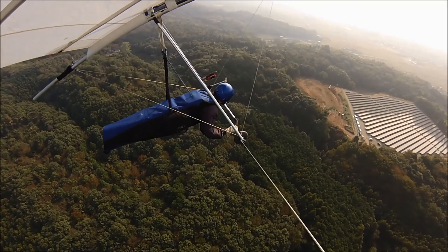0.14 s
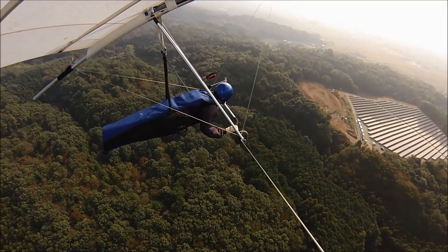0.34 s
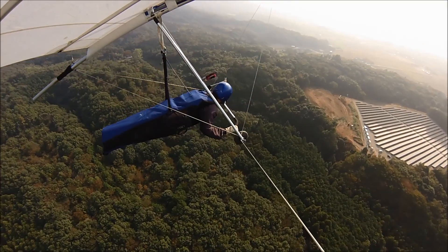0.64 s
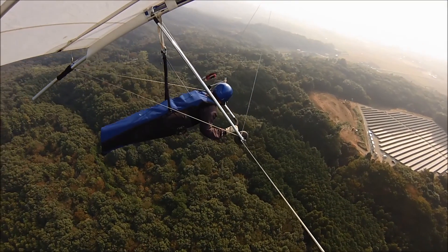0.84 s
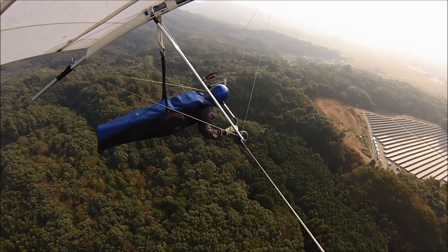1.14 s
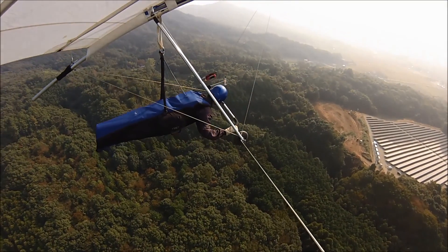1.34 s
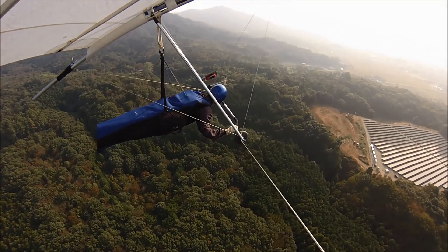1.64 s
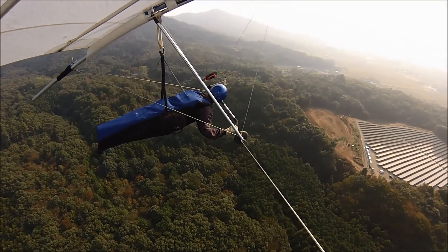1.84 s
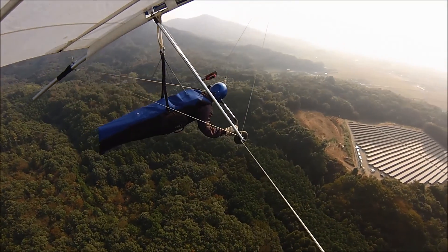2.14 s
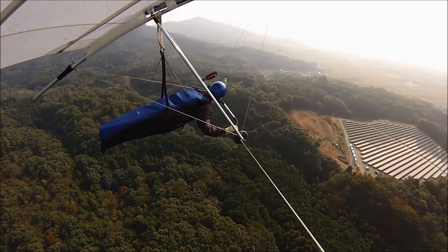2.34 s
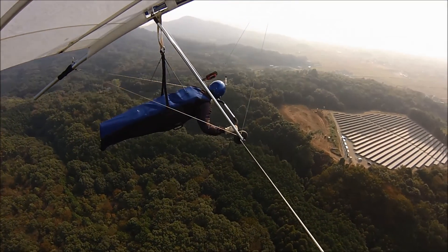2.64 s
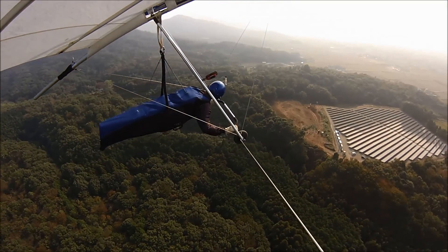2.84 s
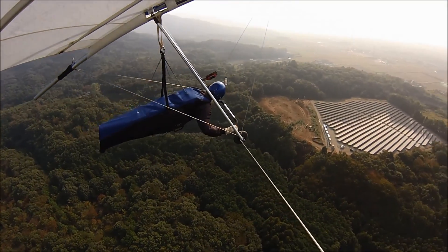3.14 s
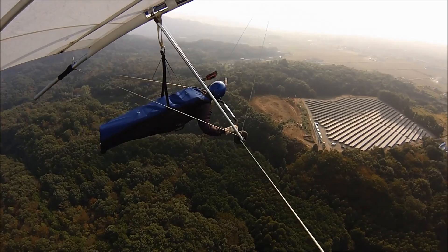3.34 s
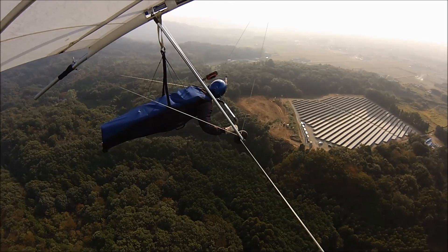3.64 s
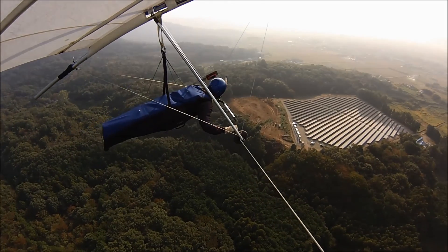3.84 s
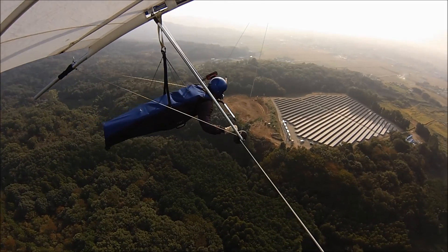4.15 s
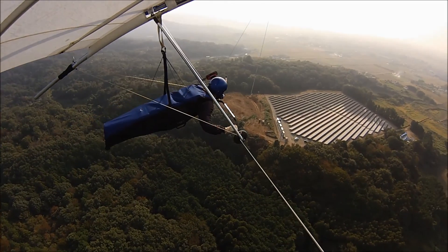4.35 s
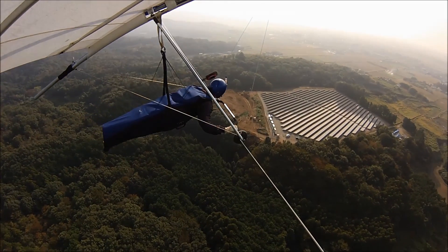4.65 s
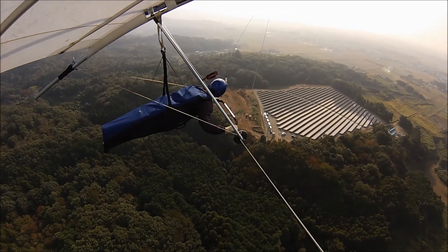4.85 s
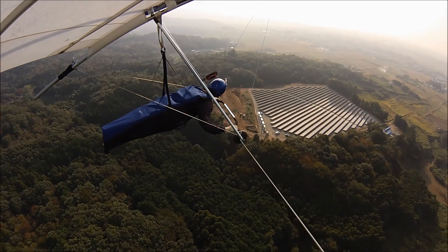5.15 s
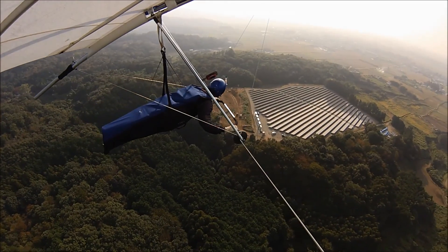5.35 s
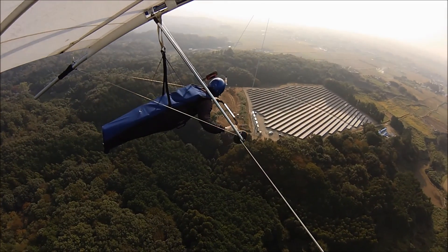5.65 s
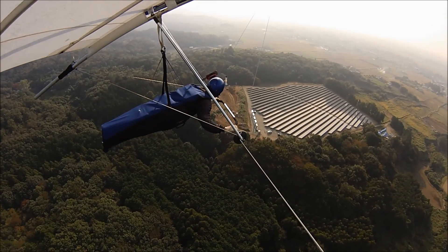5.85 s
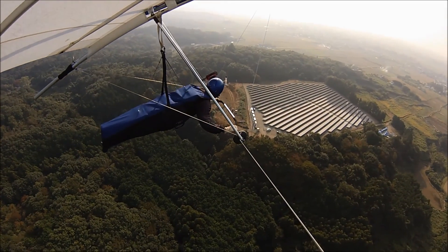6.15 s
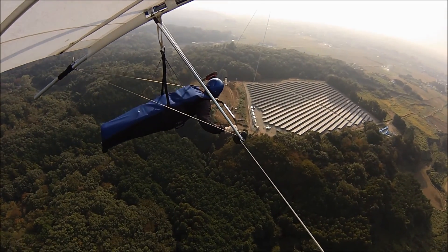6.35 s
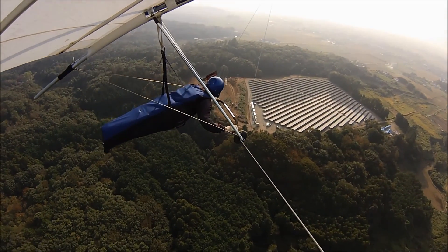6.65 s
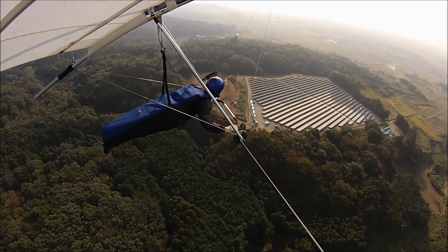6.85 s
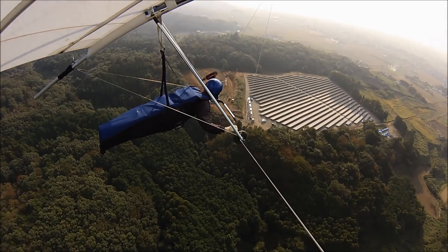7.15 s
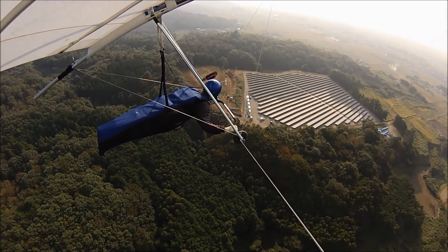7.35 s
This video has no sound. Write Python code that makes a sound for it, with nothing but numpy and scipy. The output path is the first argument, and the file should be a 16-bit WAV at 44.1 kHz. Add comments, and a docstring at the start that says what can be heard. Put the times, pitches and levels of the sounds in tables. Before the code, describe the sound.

On the wing of a hang glider in flight, low wind rumble dominates, battering a close microphone in rapid irregular thumps with small crackles and momentary lulls. A mid-range rush and thin hiss of air run throughout, with a faint breathy wire tone wavering beneath. Tiny ticks and squeaks come from the rigging, with a soft double knock around 2.4 seconds and another near 4.7.

```python
"""On the wing of a hang glider in flight, where a microphone hears turbulence, wires and rigging.
Shaped noise buffets and thumps at the microphone, which crackles at large pressure swings. Noise bands
give the rush, hiss and moan of air past sail and tubes; narrow bands that follow pitch curves are the
singing wires. Short tones and noise bursts make the ticks, squeaks, scuffs and knocks of the rigging."""
import sys
import numpy as np
from scipy import signal
from scipy.fft import rfft, irfft
from scipy.io import wavfile
from scipy.ndimage import uniform_filter1d

SR = 44100
rng = np.random.default_rng(int(sys.argv[2]) if len(sys.argv) > 2 else 0)


def transcribe(u):
    """Save the signal u as a 16-bit wav file named by the first command-line argument.

    u: samples, shape (n,) or (channels, n), limited to [-1, 1]; the rate is SR.
    q: integer samples, one column per channel.
    """
    v = np.clip(np.atleast_2d(u).T, -1, 1)
    q = np.round(v * 32767).astype(np.int16)
    wavfile.write(sys.argv[1], SR, q)


N = 330750
TIME = np.arange(N) / SR

# hardest eddies: start_s [s, centre], crackle_db [dB, relative],
# swing [share of full scale, before the lulls], half_width_s [s]
HARD_EDDIES = [(0.032, -48, 0.37, 0.0021), (.087, -51, 0.59, .002), (.181, -52, 0.36, 0.0033),
               (0.288, -45, 0.36, 0.0026), (0.376, -42, 0.47, .0028), (.453, -55, 0.37, 0.0027),
               (.5, -54, 0.38, 0.0027), (.578, -43, 0.42, 0.003), (.713, -50, 0.34, 0.0025),
               (0.731, -51, .42, .0022), (.746, -53, 0.51, 0.0023), (.846, -44, 0.43, 0.0026),
               (1.038, -40.5, 0.37, 0.0019), (1.119, -48, 0.56, 0.0026), (1.176, -63, .37, 0.002),
               (1.294, -54, 0.47, 0.0027), (1.524, -50, 0.38, 0.0027), (1.781, -50, 0.33, 0.0027),
               (1.869, -43.5, 0.41, 0.0028), (2.273, -53, 0.33, 0.0031), (3.032, -47, 0.31, 0.0063),
               (3.677, -60, .39, 0.0039), (4.343, -52, 0.32, 0.0033), (4.555, -49, 0.36, 0.0024),
               (5.1, -46, 0.33, 0.0032), (5.577, -41.5, .47, 0.0027), (5.952, -58, 0.18, 0.0017),
               (6.329, -46, 0.15, 0.0024), (6.512, -48, 0.4, 0.0029), (6.631, -50, 0.37, 0.0044),
               (7.204, -62, 0.45, 0.002), (7.355, -42, .35, .003), (7.362, -53, .42, 0.0026)]


def gain_of(db):
    """Level law: decibels to an amplitude ratio."""
    return 10 ** (np.asarray(db) / 20)


def evened(x):
    """Normalisation of mean power: scales to rms 1."""
    return x / np.sqrt(np.mean(x ** 2) + 1e-20)


def follow(rows):
    """Linear interpolation: the value columns of a curve table at every sample."""
    s, *columns = np.transpose(rows)
    return [np.interp(TIME, s, column) for column in columns]


def coloured(points):
    """Spectral shaping: white noise weighted by a spectrum of (Hz, dB per Hz), rms 1."""
    hz, db = np.transpose(points)
    freq = np.fft.rfftfreq(N, 1 / SR)
    shape_db = np.interp(np.log(freq + 1), np.log(hz), db)
    white = rng.standard_normal(N)
    return evened(irfft(rfft(white) * gain_of(shape_db), N))


def wander(rate_hz):
    """Random modulation: noise above 2 Hz that falls off smoothly past the given rate, rms 1."""
    freq = np.fft.rfftfreq(N, 1 / SR)
    weight = (freq > 2) / (1 + (freq / rate_hz) ** 2)
    return evened(irfft(rfft(rng.standard_normal(N)) * weight, N))


def steadied(x, span_s=0.068, share=0.52):
    """Partial gain levelling: divides out a share of the chance swells of a noise, rms 1."""
    power = abs(uniform_filter1d(x ** 2, int(span_s * SR))) + 1e-9
    return evened(x / power ** (share / 2))


def fuzzy(hz, width_hz, size=N):
    """Heterodyning: low-passed complex noise shifted to a pitch makes a band of noise, rms 1."""
    pole = np.exp(-np.pi * abs(width_hz) / SR)
    # the extra samples let the filter settle
    noise = rng.standard_normal((size + 4096, 2)) @ [1, 1j]
    slow = signal.lfilter([1], [1, -2 * pole, pole * pole], noise)[-size:]
    phase = 2 * np.pi * np.cumsum(hz * np.ones(size)) / SR
    return evened((slow * np.exp(1j * phase)).real)


def tone(hz, size, jitter=0.011):
    """Frequency modulation: a sine of rms 1 whose pitch jitters by a share of itself."""
    pole = .99
    drift = signal.lfilter([np.sqrt(1 - pole * pole)], [1, -pole], rng.standard_normal(size))
    phase = 2 * np.pi * np.cumsum(hz * (1 + jitter * drift)) / SR
    return np.sqrt(2) * np.sin(phase)


def add(mix, s, sound):
    """Superposition: adds a sound to the mix at time s."""
    part = mix[max(round(s * SR), 0):][:len(sound)]
    part += sound[:len(part)]


def bumps(rows):
    """Superposition of Gaussian swells, each (s, half length s, height)."""
    out = np.zeros(N)
    for s, length, height in rows:
        near = slice(max(round((s - 4 * length) * SR), 0), round((s + 4 * length) * SR))
        out[near] += height * np.exp(-((TIME[near] - s) / length) ** 2)
    return out


def surges():
    """Intermittent turbulence: the rumble swells, or now and then dips, for a moment, in dB."""
    # swells and dips: start_s [s, centre], change_db [dB, negative is quieter]
    changes = [(.075, -2), (.365, 8), (.56, 4), (.735, 3), (1.1, 1), (1.19, 4.5), (1.43, 3), (1.76, 7.5),
               (1.885, 4), (2.0, 6), (2.105, 4.5), (2.363, 6.5), (2.536, 8), (2.657, 6.5), (2.901, 2),
               (3.02, 5), (3.67, 11.5), (3.811, 7.5), (4.166, 7), (4.349, 4), (4.551, -4), (4.883, 2),
               (5.2, 5.5), (5.33, 3), (5.969, 6), (6.535, 2), (6.803, 4), (6.978, -1.5), (7.236, 0.5),
               (7.36, -8)]
    half_length_s = 0.019
    return bumps([(s, half_length_s, db) for s, db in changes])


def buffeting(eddies):
    """Turbulent pressure: large and small eddies buffet the microphone; hard ones displace the flow."""
    # turbulence: start_s [s], large_db [dB, relative], small_db [dB, relative]
    flow = [(0.0, -18, -22), (0.3, -20.5, -24.5), (1.2, -17.5, -27.5), (1.5, -20, -25), (1.8, -20.5, -27),
            (2.55, -23, -31.5), (2.85, -18.5, -28.5), (3.0, -19.5, -32), (3.3, -21, -26), (3.6, -20.5, -30),
            (4.05, -19.5, -29), (4.8, -19.5, -26), (6.15, -18.5, -27.5), (6.3, -19, -25),
            (6.45, -17.5, -27), (7.45, -19, -25.5)]
    # spectrum of the large eddies: freq_hz [Hz], level_db [dB per Hz, relative]
    rumble = [(4, -13), (14, -9), (28, -1.5), (55, -1.5), (100, -10.5), (160, -21.5), (250, -26.5),
              (800, -89), (5000, -120)]
    # spectrum of the small eddies: freq_hz [Hz], level_db [dB per Hz, relative]
    flapping = [(60, -18), (120, 3), (165, 0.5), (250, -7.5), (340, -12), (450, -23), (800, -21.5),
                (2000, -74), (8000, -110)]
    surge_share = 0.35  # part of each swell or dip that reaches the small eddies too
    ceiling = 0.44  # soft limit of the ordinary flow, share of full scale

    large_db, small_db = follow(flow)
    surge_db = surges()
    large = steadied(coloured(rumble)) * gain_of(large_db + 0.5 + (1 - surge_share) * surge_db)
    small = steadied(coloured(flapping), span_s=.04, share=0.72)
    small = small * gain_of(small_db - 4.0 + 0.5 * eddies)
    pressure = (large + small) * gain_of(0.73 * eddies + surge_share * surge_db)
    pressure = pressure / (1 + (pressure / ceiling) ** 4) ** (1 / 4)

    signs = rng.choice([-1, 1], len(HARD_EDDIES))
    for (s, _, swing, half_s), sign in zip(HARD_EDDIES, signs):
        near = slice(max(round((s - .05) * SR), 0), round((s + .05) * SR))
        u = (TIME[near] - s) / half_s
        pressure[near] *= 1 - np.exp(-(u / 2) ** 2)
        # a main swing with a shallow opposite swing on each side
        pressure[near] += sign * swing * (1 - u ** 2 / 2) * np.exp(-u ** 2 / 2)
    return pressure


def airstream(eddies):
    """Aeroacoustic noise: flow past sail and tubes rushes, hisses and moans in fluttering bands."""
    # stream over the wing: start_s [s], rush_db [dB], hiss_db [dB], before the flutter
    stream = [(0, -43.5, -54), (.9, -42, -57.5), (1.5, -40, -55), (2.1, -43.5, -57.5), (2.7, -41.5, -56.5),
              (3.45, -41.5, -53.5), (3.75, -42, -56), (4.2, -39.5, -53.5), (5.3, -41, -53.5),
              (6.1, -40, -54.5), (6.3, -40, -53), (6.52, -41, -53), (6.95, -40.5, -54), (7.5, -43.5, -55.5)]
    # spectrum of the rush: freq_hz [Hz], level_db [dB per Hz, relative]
    rush_spectrum = [(100, -39), (250, -0.5), (400, 3.5), (620, -0.5), (850, -1), (1000, -6.5), (1200, -13),
                     (1500, -20.5), (2300, -30), (5000, -65)]
    # spectrum of the broad hiss: freq_hz [Hz], level_db [dB per Hz, relative]
    hiss_spectrum = [(700, -5.5), (1400, 3), (1800, 6.5), (2250, -5), (2850, 1.5), (3300, -6.5),
                     (3700, -3.5), (4250, -11), (4700, -17.5), (6000, -14.5), (7200, -20), (9500, -25.5),
                     (12000, -29.5), (15000, -39)]
    # narrow hiss near 5 kHz: start_s [s], level_db [dB, before the flutter]
    jet_curve = [(0.0, -68), (0.75, -73.5), (1.2, -70), (1.35, -64), (1.65, -69), (2.0, -70), (2.25, -65),
                 (2.85, -71.5), (3.45, -66.0), (3.7, -69), (4.0, -61.5), (4.25, -67.0), (4.85, -61.5),
                 (5.3, -68), (5.7, -59.5), (6.15, -66.5), (6.35, -64), (6.52, -60.5), (6.9, -65.5),
                 (7.45, -69)]
    # pair of reedy hisses from the tubes: start_s [s], level_db [dB, relative]
    tube_curve = [(0, -80.5), (1.5, -68), (2.7, -71.5), (3.4, -67.5), (5.3, -69.5), (5.8, -63), (6.25, -69),
                  (6.53, -60.5), (6.9, -70), (7.15, -62), (7.5, -60)]
    # moan of the frame tubes as the glider gathers speed: start_s [s], level_db [dB]
    moan_curve = [(0, -52), (3.8, -52.5), (4.4, -49.5), (5.3, -40.5), (6.1, -44.5), (6.7, -55.5),
                  (7.5, -53)]

    rush_db, hiss_db = follow(stream)
    flutter_db = wander(rate_hz=31)
    rush = coloured(rush_spectrum) * gain_of(rush_db + 0.91 * eddies + flutter_db)
    fast_db = 0.43 * wander(rate_hz=140)
    hiss = coloured(hiss_spectrum) * gain_of(hiss_db + .5 * eddies + 0.95 * flutter_db + fast_db)

    # the narrow hiss rises by 24 Hz per dB as it swells
    jet_db = follow(jet_curve)[0]
    jet_hz = 5196 + 24 * (jet_db - jet_db.mean())
    upper = fuzzy(jet_hz, width_hz=920) * gain_of(jet_db + 1.4 * wander(rate_hz=25))

    # the reedy pair and the moan share one sway in pitch
    sway = 1 + .015 * wander(rate_hz=6.08)
    pair = fuzzy(4180 * sway, width_hz=470) + gain_of(-1) * fuzzy(2650 * sway, width_hz=680)
    lower = pair * gain_of(follow(tube_curve)[0] + 1.6 * wander(rate_hz=11.0))
    moan = fuzzy(324.3 * sway, width_hz=70) * gain_of(follow(moan_curve)[0])

    # the bright band grows 3.8 dB for each dB of hiss, from -62 dB at a hiss of -53 dB
    bright_db = -62 + 3.8 * (hiss_db + 53)
    bright = fuzzy(3100, width_hz=2700) * gain_of(bright_db + flutter_db)
    return rush + moan + hiss + bright + upper + lower


def wires():
    """Vortex shedding: wires sing, lower when thicker; the main and thick ones share a random waver."""
    # main wire: start_s [s], pitch_hz [Hz, before the waver], level_db [dB, relative]
    song = [(0, 890, -47.5), (.85, 879.4, -47), (1.2, 832, -51), (1.5, 855, -43), (1.85, 809, -46.5),
            (2.25, 785, -50), (2.45, 830, -44), (2.7, 815, -45), (3.2, 886.6, -48), (3.55, 880, -48),
            (3.9, 872, -46), (4.4, 858.5, -45.5), (4.75, 884, -44), (5.95, 856.4, -45), (6.4, 858.6, -45),
            (7.5, 842, -48.5)]
    # thick wire, most of all in the turn: start_s [s], pitch_hz [Hz, before the waver],
    # level_db [dB, before the waver]
    hum = [(0, 740, -69), (1.1, 700, -54), (1.4, 715, -52.5), (1.8, 727, -43.5), (2.05, 718, -48),
           (2.25, 700, -52), (2.4, 722, -50), (2.7, 760, -55), (3.2, 790, -50), (4.9, 800, -52.5),
           (7.5, 770, -51)]
    # thin wire: start_s [s], pitch_hz [Hz], level_db [dB, relative]
    whistle = [(0, 1001, -68), (1.1, 1015, -55), (1.7, 1074, -52.5), (2.2, 1118, -53.5), (2.5, 1044, -57),
               (2.8, 1000, -53), (3.0, 1020, -52), (3.4, 1040, -56), (4.45, 996, -54.5), (5.65, 983, -66),
               (7.5, 1020, -75)]

    waver_hz = 7 * wander(rate_hz=6.0)
    main_hz, main_db = follow(song)
    thick_hz, thick_db = follow(hum)
    thin_hz, thin_db = follow(whistle)
    main = fuzzy(main_hz + waver_hz, width_hz=56) * gain_of(main_db - 1.0 + 1.2 * wander(rate_hz=9.7))
    thick = fuzzy(thick_hz + waver_hz, width_hz=26) * gain_of(thick_db + 3.1 * wander(rate_hz=14))
    thin = fuzzy(thin_hz, width_hz=18) * gain_of(thin_db - 5.0)
    return main + thick + thin


def crackle(pressure):
    """Threshold overload: the microphone spits at large swings; the hardest eddies also ring."""
    # spectrum of the spitting: freq_hz [Hz], level_db [dB per Hz, relative]
    spit_spectrum = [(500, 4), (2300, 5), (4000, -2), (6500, -6.5), (9000, -10.5), (14000, -17.5),
                     (16000, -22)]
    onset = 0.13  # pressure where spitting begins, share of full scale
    burst_s = .0012

    fickle_db = 4 * np.minimum(wander(rate_hz=300), 2)
    size = gain_of(-44 + fickle_db) * np.maximum(abs(pressure) - onset, 0)
    t = np.arange(-4 * burst_s, 4 * burst_s, 1 / SR)
    spit_shape = np.exp(-(t / burst_s) ** 2)
    ring_shape = np.exp(-(t / burst_s) ** 2 / 2)
    rings = np.zeros(N)
    # each hard eddy rings at its own pitch
    detunes = rng.uniform(.8, 1.3, len(HARD_EDDIES))
    for (s, db, _, _), detune in zip(HARD_EDDIES, detunes):
        add(size, s + t[0], gain_of(db - 1) * spit_shape)
        ring = tone(2750 * detune, len(t), jitter=.03)
        add(rings, s + t[0], gain_of(db - 5) * ring * ring_shape)
    return rings + size * steadied(coloured(spit_spectrum), span_s=0.0024, share=0.88)


def thumps():
    """Flow breakup: strong gusts break up on the microphone's housing as dull bursts of noise."""
    # gusts: start_s [s, centre], length_s [s], level_db [dB]
    gusts = [(0.075, 0.026, -22), (0.456, 0.025, -21), (0.69, 0.042, -24.5), (0.736, 0.058, -20.5),
             (0.843, 0.024, -30), (1.033, 0.02, -24), (1.118, 0.025, -27.5), (1.639, 0.046, -30),
             (1.93, 0.032, -28.5), (2.788, 0.018, -38), (3.012, 0.028, -29), (3.341, 0.026, -28),
             (3.47, 0.022, -29), (4.39, 0.039, -25), (4.944, 0.036, -25), (5.83, 0.021, -32),
             (5.944, .03, -29), (6.442, 0.025, -29), (6.837, .03, -29.5), (7.198, 0.028, -33)]
    # spectrum of a thump: freq_hz [Hz], level_db [dB per Hz, relative]
    thump_spectrum = [(50, -28.5), (160, 9), (300, 0.5), (500, -14), (800, -17), (1500, -35), (6000, -59.5)]
    size = np.zeros(N)
    for s, length, db in gusts:
        add(size, s - length / 2, gain_of(db) * np.hanning(int(length * SR)))
    return size * steadied(coloured(thump_spectrum), span_s=0.019, share=0.98)


def lulls():
    """Intermittency: the flow mostly drops for a moment between eddies, in dB."""
    # lulls: start_s [s, centre], half_length_s [s], depth_db [dB, negative is quieter]
    dips = [(0.15, 0.0087, -10), (0.23, 0.032, -2), (0.404, 0.0084, -11), (0.772, 0.0089, -12),
            (1.145, 0.0095, -11), (1.342, 0.014, -5), (1.472, 0.032, -6), (1.83, 0.013, -5),
            (2.046, 0.025, -3), (2.2, 0.03, 1), (2.592, 0.029, -3.5), (2.719, 0.033, -6), (3.23, 0.043, -3),
            (3.989, 0.014, -8), (4.106, 0.0088, -9), (4.378, 0.0085, -17), (5.132, 0.02, -1),
            (5.377, 0.03, -2.5), (5.607, 0.022, -4.5), (5.87, 0.013, -3.5), (6.02, 0.025, -2),
            (6.197, 0.059, -2.5), (6.365, 0.04, -3.5), (6.62, 0.021, -1.5), (7.064, 0.022, -5),
            (7.139, 0.012, -4), (7.31, 0.0087, -14), (7.406, 0.028, -4.5)]
    return bumps(dips)


def rigging():
    """Stick-slip: loaded fittings tick and squeak as they slip; friction makes cloth scuff and flutter."""
    # ticks: start_s [s], level_db [dB, relative], length_s [s], lower_hz [Hz], upper_hz [Hz]
    ticks = [(1.386, -47.5, 0.0072, 3950, 6200), (1.4477, -48, 0.0056, 3940, 6100),
             (2.63, -51.5, 0.012, 4100, 5300), (2.9930, -51, 0.016, 3925, 6000),
             (3.775, -47, .003, 4200, 5250), (3.9155, -53.5, .005, 4280, 5400),
             (4.4363, -50, 0.0047, 4250, 5420), (5.486, -46, 0.0039, 4170, 5420),
             (5.636, -52, 0.0037, 4150, 5400), (5.758, -51, .004, 4150, 5405),
             (6.419, -50, 0.0037, 4160, 5356), (6.975, -54, .004, 4100, 5300),
             (7.044, -53, .004, 4250, 5174)]
    # squeaks: start_s [s], length_s [s], from_hz [Hz], to_hz [Hz], arch_hz [Hz, mid-glide rise],
    # level_db [dB, before the fade in and out]
    squeaks = [(1.808, .055, 4500, 5500, 220, -54.5), (2.11, .06, 4850, 5400, 100, -63.5),
               (2.195, .09, 3600, 3950, 500, -63.5), (2.26, .1, 4050, 3650, 0, -65),
               (4.525, .04, 4850, 5500, 0, -55), (7.29, .085, 4700, 5900, 0, -62.5)]
    # cloth scuffs: start_s [s], length_s [s], centre_hz [Hz], width_hz [Hz],
    # level_db [dB, before the fade in and out]
    scuffs = [(2.423, 0.035, 1350, 900, -45), (2.432, 0.084, 1487, 1200, -54),
              (4.365, .035, 2600, 1100, -52), (4.664, 0.04, 1590, 600, -49), (6.14, 0.046, 1900, 2400, -47),
              (6.319, .022, 2500, 2400, -55)]

    out = np.zeros(N)
    for s, db, length, lower_hz, upper_hz in ticks:
        size = int(length * SR)
        ring = gain_of(-1.0) * tone(lower_hz, size, jitter=.022)
        ring = ring + gain_of(-2) * fuzzy(upper_hz, 600, size)
        scrape = gain_of(-10) * fuzzy(5490, 3000, size)
        body = gain_of(-2.0) * fuzzy(1950, 600, size)
        # rises fast, falls more slowly
        swell = np.sin(np.pi * np.sqrt(np.linspace(0, 1, size)))
        add(out, s, gain_of(db) * (ring + scrape + body) * swell)

    for s, length, from_hz, to_hz, arch_hz, db in squeaks:
        size = int(length * SR)
        arch = arch_hz * np.sin(np.linspace(0, np.pi, size))
        glide_hz = np.linspace(from_hz, to_hz, size) + arch
        add(out, s, gain_of(db) * tone(glide_hz, size, jitter=0.022) * np.hanning(size))

    flutter = gain_of(3 * wander(rate_hz=140))
    for s, length, centre_hz, width_hz, db in scuffs:
        size = int(length * SR)
        cloth = fuzzy(centre_hz, width_hz, size) * flutter[round(s * SR):][:size]
        add(out, s, gain_of(db) * evened(cloth) * np.hanning(size))
    return out


def knocks():
    """Modal decay: loose frame parts knock and ring in modes, the higher dying away faster."""
    # knocks: start_s [s], level_db [dB, relative], pitch_hz [Hz],
    # t60_s [s, decay by 60 dB for a mode of ratio 1]
    blows = [(2.435, -36.5, 1031, 0.16), (2.454, -37, 1038, 0.17), (4.675, -36, 1446, 0.054)]
    # modes of the frame: ratio [multiple of the pitch], level_db [dB, relative]
    modes = [(0.999, -2.5), (1.26, -6.5), (1.56, -21), (1.83, -19)]
    attack_s = .0012
    out = np.zeros(N)
    t = TIME[:SR // 10]
    for s, db, hz, t60 in blows:
        ring = np.zeros(len(t))
        for ratio, mode_db in modes:
            ring += gain_of(mode_db - 60 * t * ratio / t60) * tone(hz * ratio, len(t))
        add(out, s, gain_of(db) * ring * np.minimum(t / attack_s, 1))
    return out


def scene():
    """Common modulation: one field of eddies stirs the buffeting, the rush and the hiss together."""
    eddies = wander(rate_hz=31.0)
    lull_db = lulls()
    pressure = buffeting(eddies) * gain_of(lull_db)
    # a fifth of each lull, in dB, reaches the airstream
    air = airstream(eddies) * gain_of(0.2 * lull_db)
    microphone = pressure + thumps() + crackle(pressure)
    return (microphone + air + wires() + rigging() + knocks())[None]


def record(dry):
    """Self-noise and band limiting: the microphone's fizz, a soft start and a low-pass filter."""
    # spectrum of the steady fizz: freq_hz [Hz], level_db [dB per Hz, relative]
    fizz = [(2000, -4.5), (7000, -0.5), (9500, -3), (12000, -0.5), (15000, -9.5)]
    fizz_db, edge_hz, fade_s = -73, 15600, .004
    fade_in = np.minimum(TIME / fade_s, 1)
    sound = (dry + gain_of(fizz_db) * coloured(fizz)) * fade_in
    low_pass = signal.firwin(511, edge_hz, window=("kaiser", 9), fs=SR)
    return signal.oaconvolve(sound, low_pass[None], "same")


dry = scene()
out = record(dry)
transcribe(out)
```